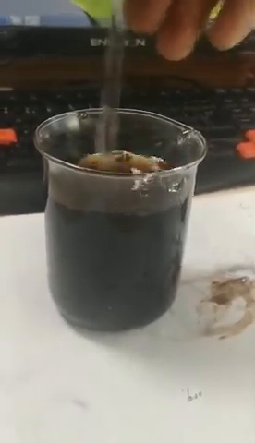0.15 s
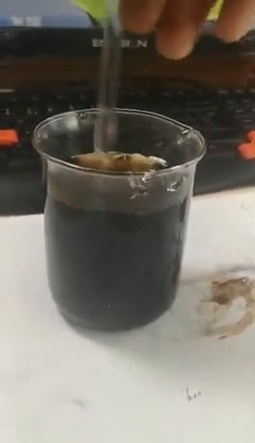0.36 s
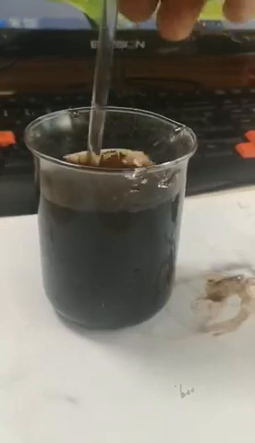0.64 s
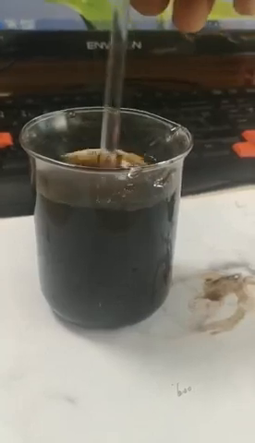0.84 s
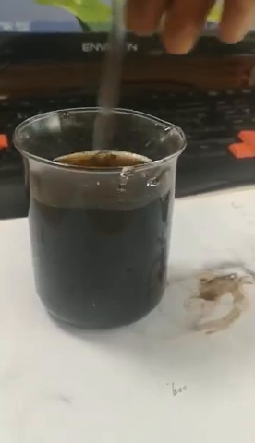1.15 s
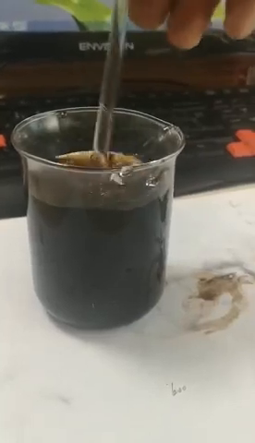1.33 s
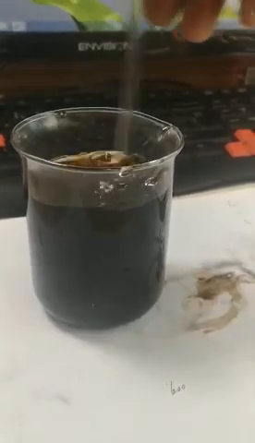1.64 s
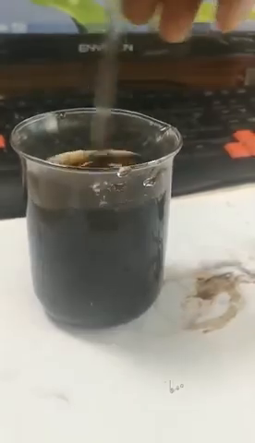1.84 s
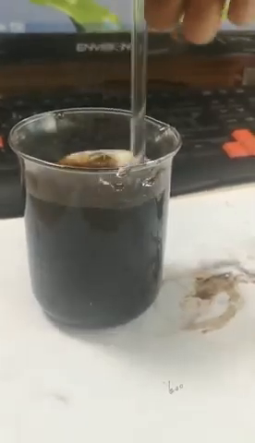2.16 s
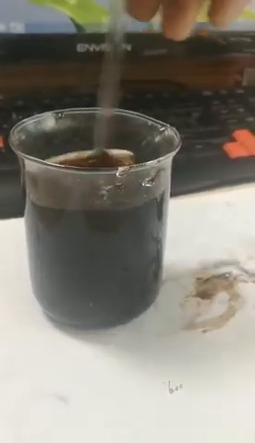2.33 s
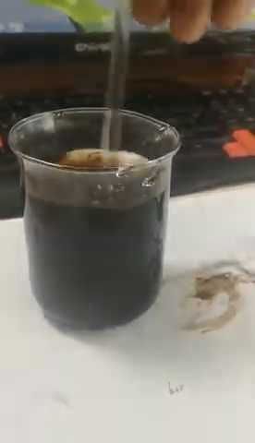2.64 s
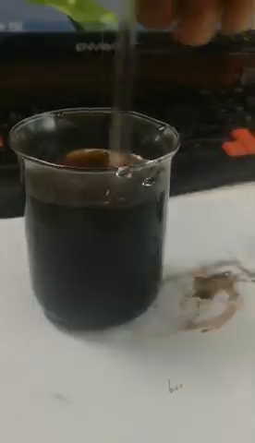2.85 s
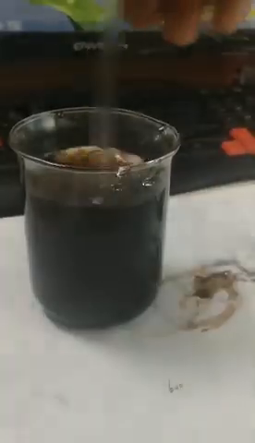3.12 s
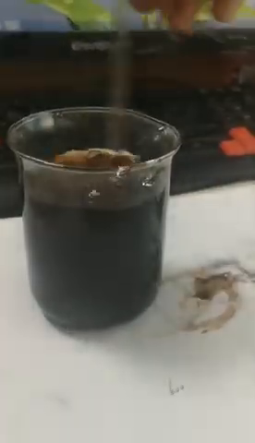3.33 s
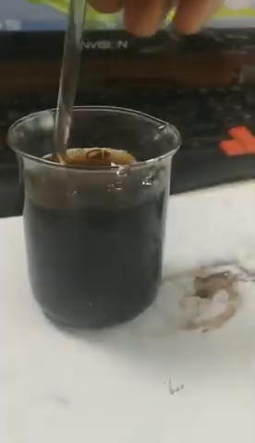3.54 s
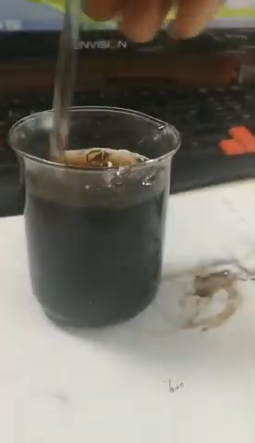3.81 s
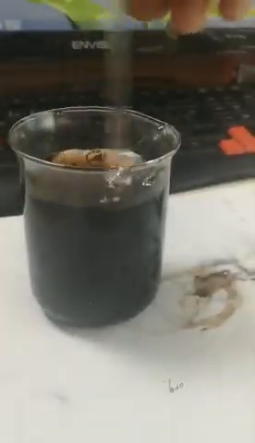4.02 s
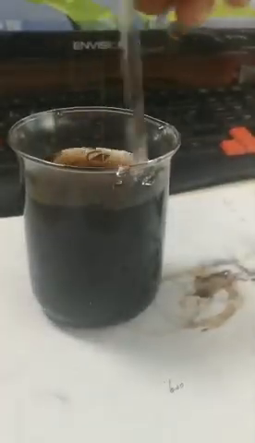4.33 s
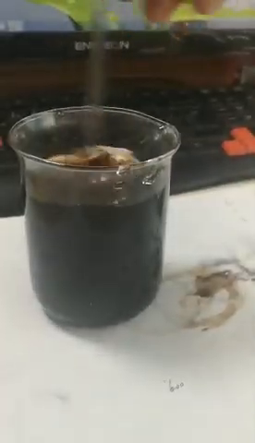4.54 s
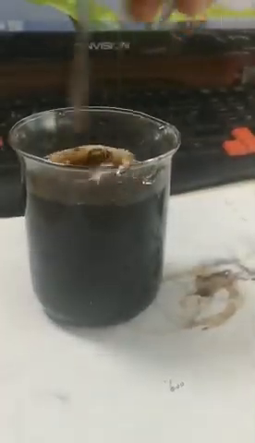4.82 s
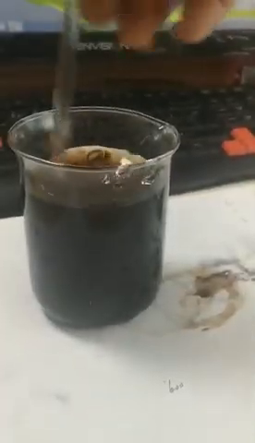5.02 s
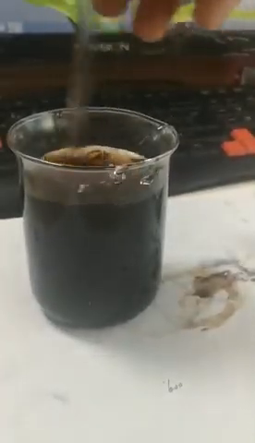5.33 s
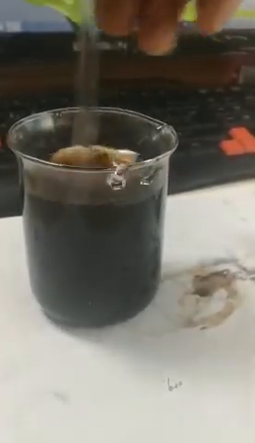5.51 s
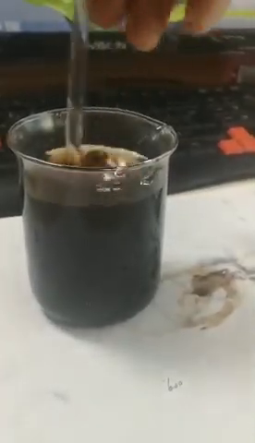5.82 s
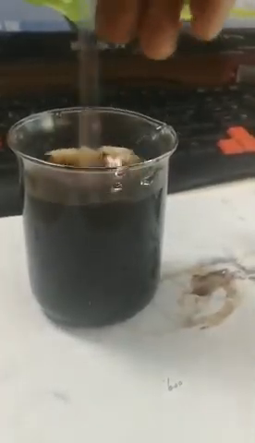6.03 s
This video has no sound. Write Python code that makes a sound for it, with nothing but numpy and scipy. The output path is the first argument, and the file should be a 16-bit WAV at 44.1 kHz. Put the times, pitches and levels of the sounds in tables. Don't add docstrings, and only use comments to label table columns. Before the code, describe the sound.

A glass rod clinks brightly and irregularly against a full glass beaker, sparse at first, then faster and harder, over a faint room hum.

```python
import sys
import numpy as np
from scipy import signal
from scipy.fft import rfft, irfft, next_fast_len
from scipy.io import wavfile
from scipy.ndimage import uniform_filter1d, map_coordinates

SR = 44100
rng = np.random.default_rng(int(sys.argv[2]) if len(sys.argv) > 2 else 0)


def attenuation_scalar(level_db):
    decades = np.asarray(level_db, float) / 20
    return 10 ** decades


def generate_wav(signal):
    frames = np.transpose(np.atleast_2d(signal))
    scaled = np.clip(frames, -1, 1) * 32767
    pcm = np.round(scaled).astype(np.int16)
    wavfile.write(sys.argv[1], SR, pcm)


N = 272097


def unit(x):
    return x / np.sqrt(np.mean(x ** 2) + 1e-20)


def along(points, hz):
    f, v = np.transpose(points)
    return np.interp(np.log(hz + 1), np.log(f + 1), v)


def curve(rows, silent=None):
    s, v = np.transpose(rows)
    return np.interp(np.arange(N) / SR, s, v, silent, silent)


def swell(start, attack, hold, release, db):
    corners = start + np.cumsum(np.abs([0, attack, hold, release]))
    return attenuation_scalar(curve(np.c_[corners, db - np.array([40, 0, 0, 40])], silent=-150))


def filtered(x, response):
    m = next_fast_len(N + 8192)
    return irfft(rfft(x, m) * response(np.fft.rfftfreq(m, 1 / SR)), m)[..., :N]


def stereo_noise(gain, alike, lag_s):
    def mix(hz):
        turn = np.arccos(np.clip(along(alike, hz), -1, 1)) / 2
        return gain(hz) * [np.cos(turn), np.sin(turn)]

    def delay(hz):
        lags = np.array([[lag_s], [0]]) / (1 + (130 / (hz + 1)) ** 2)
        return np.exp(-2j * np.pi * hz * lags)

    common, differing = filtered(rng.standard_normal((2, N)), mix)
    return unit(filtered(np.array([common + differing, common - differing]), delay))


# frequency in Hz, level in dB per Hz.
FAN_AIR = [(12, -29.5), (20, 9), (75, -20.5), (195, -4.5), (230, -6), (330, -10), (440, -2), (500, -13),
           (800, -13.5), (1750, -16.5), (2600, -21.5), (3800, -38), (8000, -38), (16000, -48)]
# hum in Hz, width in Hz, level in dB.
MACHINE_HUMS = [(99.5, 3.1, -68), (120.4, 2.1, -67), (189.3, 5.8, -64.5), (327.1, 10, -65), (655, 1.7, -79),
                (1720, 20, -77.5)]
# frequency in Hz, likeness of the two ports from 0 to 1 once the lag is removed.
PORT_LIKENESS = [(60, 1), (300, 1), (1000, 0.57), (3000, 0.13), (8000, .1)]


def fan_and_machines():
    def lines(f):
        return sum(attenuation_scalar(db) * np.sqrt(w) / np.hypot(w, 2 * (f - hz)) for hz, w, db in MACHINE_HUMS)

    air = attenuation_scalar(-59) * stereo_noise(lambda f: attenuation_scalar(along(FAN_AIR, f)), PORT_LIKENESS, lag_s=26 / SR)
    hum = attenuation_scalar(-57.5) * stereo_noise(lines, PORT_LIKENESS, lag_s=26 / SR)
    return filtered(air + hum, lambda f: attenuation_scalar(np.array([[-1.6], [1.6]]) / (1 + (300 / (f + 1)) ** 2)))


# middle in seconds, level in dB.
HAND_SHIFTS = [(0.05, -63), (0.65, -63), (1.27, -56), (1.58, -64), (2.291, -63), (2.8, -69.5),
               (3.309, -56.5), (3.53, -53.5), (3.9, -53.5), (4.19, -70), (4.6, -62.5), (4.94, -56),
               (5.41, -54.5), (5.65, -57), (6.098, -49.5)]


def hand_on_phone():
    t, half_width_s = np.arange(N) / SR, 0.073
    shifts = sum(attenuation_scalar(db) * np.exp(-((t - s) / half_width_s) ** 2) for s, db in HAND_SHIFTS)
    rumble = stereo_noise(lambda f: (f / 30) / (1 + (f / 50) ** 4), [(50, .99)], lag_s=0)
    thud = stereo_noise(lambda f: 1 / (1 + ((f - 140) / 50) ** 4), [(50, 1.0)], lag_s=0)
    thud_gain = attenuation_scalar(-5.5) * shifts * (shifts / attenuation_scalar(-54.5)) ** .7
    return (attenuation_scalar(-65.5) + shifts) * rumble + thud_gain * thud


# start in seconds, force in dB,
# height toward the rim, weight behind the rod, strike angle in rad.
CLINKS = [(0.2410, 1, -0.64, 0.35, 0.54), (0.6050, -1, -0.32, -0.37, 0.55), (1.0648, -2, -.7, -0.77, 0.72),
          (1.2211, 2, -2.3, 2.5, 0.58), (1.7684, 0.5, 0.04, -0.16, 0.82), (2.9090, 5, -0.13, -0.07, 0.53),
          (3.1823, 5.5, -0.14, 0.67, 0.21), (3.4603, 7, 0.82, 1.14, 0.25), (3.5834, 3.5, 0.65, -0.73, 0.73),
          (3.7700, 12.5, .3, 0.46, 0.55), (4.0586, 7.5, 2, 1.25, 0.15), (4.4016, 1.5, -0.05, -0.77, 0.55),
          (4.9486, 1.6, 0.057, 0.24, 0.45), (5.1983, -3, -0.36, 0.55, 0.092),
          (5.3743, -2.5, 0.41, -0.6, 0.74), (5.5172, 1.5, -0.48, 0.66, 0.92), (5.6197, 6.5, 1.1, -2, .13),
          (5.8955, 4, 0.76, 1.47, 0.59), (6.0083, 5, -1.04, 1.74, 0.28), (6.1374, 9, 0.44, 0.44, 0.85)]
TOUCHES = [(1.1950, -8.5, -2.2, 0.1, 0.7), (1.4533, -16.5, -0.4, 2, 0.097), (1.6388, -47, -3.5, -3.5, 0.32),
           (3.219, -18, 2.3, 0.2, 0.18), (3.2660, -11, -1.2, -2.5, 0.66), (3.2954, -18.5, 1.1, 1.5, 0.49),
           (3.6062, -2, 1, 1.12, 0.56), (3.8017, -3, -0.5, 0.03, 0.35), (4.0815, 4, -1, -2.2, 0.61),
           (4.2166, -23.5, -0.5, -1.1, 0.54), (4.7361, -29.5, -1.7, -2, 0.61), (5.3100, -33, -2.5, -4, 0.4),
           (5.6439, 0.3, 2.5, 1.92, 0.51)]
# dB at force 0, dB per dB of force, dB per height, dB per weight.
ANSWER = dict(oval=(-59.5, 0.63, 0, 7), triangle=(-42, 1.3449, -4.5, -3), square=(-32.5, 1.06, -1.5, -0.37),
          click=(-29, 0.98, 2.6, -0.5), low=(-41, 1.16, -3.5, 2.6), mid=(-30, 0.93, -1, 3),
          rim=(-39.5, 0.75, 4, 1.5), high=(-28.5, 1.1939, 2, 0.84), blow=(-25.5, 0.23, -1.6, 0.8),
          knock=(-42.5, 0.61, -1.66, 6), edge=(-35, 0.76, 4.5, -1))


def contacts():
    s, force, height, weight, angle = np.transpose(sorted(CLINKS + TOUCHES))
    at = np.round((s - .0003) * SR).astype(int)
    db = {name: base + a * force + b * height + c * weight for name, (base, a, b, c) in ANSWER.items()}
    rebound = (np.diff(s, prepend=0) < .036) & (np.diff(force, prepend=0) < 0)
    return at, force, weight, angle, rebound, db


# time in seconds, pitch in Hz.
SWIRL = [
    (0.28, 2709),
    (1.8, 2703),
    (2.93, 2682),
    (3.3, 2682),
    (3.65, 2697),
    (3.8, 2674),
    (4.15, 2693),
    (4.45, 2677),
    (4.97, 2672),
    (6.17, 2670),
]


def water_clocks():
    clock = np.arange(N) / SR
    slosh_hz = 6 * np.sin(2 * np.pi * 6.5 * clock)
    drift = np.cumsum((curve(SWIRL) + slosh_hz) / TRIANGLE[0][0] - 1) / SR
    ripples = map_coordinates(rng.standard_normal(N // 700 + 4), [clock * SR / 700])
    return clock, drift, drift + .0022 * np.cumsum(ripples) / SR


def ring(modes, at, level_db, shares, bend, damped_db, slide, scatter_rad):
    out = np.zeros((2, N))
    ears = np.array([[.5], [-.5]])
    for k, (hz, db, t60, side_db, lead) in enumerate(modes):
        luck = rng.standard_normal((len(at), 2))
        carrier = np.exp(2j * np.pi * hz * bend)
        swing = np.tile(slide * rng.standard_normal(N) + 0j, (2, 1))
        blow = attenuation_scalar(level_db + ears * 4.0 * luck[:, 0]) * np.exp(1j * ears * scatter_rad * luck[:, 1])
        swing[:, at] += blow * shares[k % len(shares)] / carrier[at]
        lost_db = 60 * np.arange(N) / (t60 * SR) + damped_db
        for a in range(1, N, SR // 4):
            part = slice(a, a + SR // 4)
            grow = attenuation_scalar(lost_db[part] - lost_db[a - 1])
            swing[:, part] = (swing[:, [a - 1]] + np.cumsum(swing[:, part] * grow, axis=1)) / grow
        swing = uniform_filter1d(swing, size=24, origin=11)
        out += (attenuation_scalar(db + ears * side_db) * np.exp(1j * ears * lead) * swing * carrier).imag
    return out


# pitch in Hz, level in dB, t60 in seconds,
# left over right in dB, left lead in rad.
OVAL = [(946, -4, 1.8, -3, .4), (974, -4, 1.8, 0, .2)]
TRIANGLE = [(2685, -3, .7, 6, 2.9), (2698, -6.5, .6, 6, -2.6), (2535, -13, .2, 3, 2)]
SQUARE = [(5325, -2, .16, 2, -1.2), (5395, -2, .11, 0, -1.2), (5125, -31, .3, 0, 0)]
RIM = [(6935, 0, .16, 8, .1), (6400, -14, .1, 3, .3)]
HIGH = [(9235, -12, .15, 7, -.7), (9320, -12, .13, 7, -.4), (9270, 0, .016, 7, 0)]
MID_ROD = [(5800, -16, .18, 0, .4), (5900, -14, .14, 0, 1.2), (5855, 0, .04, 1, .8)]
# time in seconds, looseness in dB.
LOOSE = [(0.24, 1.5), (0.6, -6.5), (1.07, -2.5), (1.22, 0), (1.77, -1.5), (3.18, -2), (3.46, -3), (3.58, 2),
         (3.77, -2), (4.06, -4), (4.4, 4), (4.95, 1.6), (5.2, 6), (5.52, 0.5), (5.62, 3.5), (5.643, 5.5),
         (5.9, -0.5), (6.01, -1)]


def long_ringing(contact, clocks, slide):
    at, force, weight, angle, rebound, db = contact
    clock, drift, rough = clocks
    loose_db = curve(LOOSE)[at]

    def twins(lobes):
        return [np.cos(lobes * angle), np.sin(lobes * angle), 1]

    def taken(loss_db):
        return np.cumsum(np.bincount(at - 1, np.clip(loss_db, 0, 25), N))

    damped = taken((6 + 0.27 * force + 1.9 * weight) * np.where(rebound, .2, 1))
    stopped = taken((6 + 0.71 * force) * ~rebound)
    triangle_db = db["triangle"] + 0.5 - 10 * rebound
    square_db = db["square"] - .8 * loose_db + 9.5 - 3 * rebound
    out = ring(OVAL, at, db["oval"] + 2.0, twins(2.05), clock + drift, stopped, 0 * slide, 0.31)
    out += ring(OVAL[:1], np.array([1]), -62.5, [1], clock + drift, stopped, 0 * slide, 0.56)
    out += ring(TRIANGLE, at, triangle_db, twins(0.93), clock + drift, damped, 0.076 * slide, 0.54)
    out += ring(SQUARE, at, square_db, twins(2.4), clock + .8 * rough, damped, 0.34 * slide, .4)
    out += ring(RIM, at, db["rim"] - 2.0, [1], clock + rough, damped, 0.52 * slide, .5)
    out += ring(HIGH, at, db["high"] + 5, twins(0.99), clock + rough, damped, 0.27 * slide, 0.51)
    out += ring(MID_ROD, at, db["mid"] + loose_db + 7, twins(4.6), clock + rough, damped, 1.2 * slide, 1.0)
    return out


def choked(modes, at, level_db, side_db, scatter_db, shift):
    out, t = np.zeros((2, N + SR)), np.arange(SR // 20) / SR
    hz, db, t60 = np.transpose(modes)[:, :, None]
    luck = rng.standard_normal((len(at), 4, len(modes), 1))
    onset = 1 - np.exp(-t / .0004)
    for start, level, side, (size, pitch, lean, lead) in zip(at, level_db, side_db, luck):
        decay_db = 60 * t / np.clip(t60, .004, .02)
        shape = attenuation_scalar(level + db + scatter_db * size - decay_db) * onset
        for ear, sign, late in ((0, .5, 0), (1, -.5, 24)):
            phase = 2 * np.pi * hz * (1 + shift * pitch) * t + sign * .5 * lead
            wave = attenuation_scalar(sign * (side + 5.8 * lean)) * np.sin(phase)
            out[ear, start + late:][:len(t)] += (shape * wave).sum(axis=0)
    return out[:, :N]


# pitch in Hz, level in dB, t60 in seconds.
KNOCK = [(2410, 4.5, 0.013), (2105, -8, .03), (1570, -15.5, 0.018), (1327, -16, 0.022),
         (5100, -12.5, 0.016), (6100, -2, 0.027), (9600, -8.5, .02), (10240, -10.5, .02)]
LOW_ROD = [(3870, -2.5, 0.022), (3820, -9, 0.01), (3960, -9, 0.0086), (4280, -16, 0.017)]
EDGE = [(6587, -2, 0.048), (7797, 0, 0.0092), (9390, -2.5, 0.018), (9870, -10, .02)]
CLICK = [(10050, -8, .016), (10750, -5.5, 0.016), (11940, -8, 0.02), (12540, -3.5, 0.026),
         (14000, -7, .016), (14700, -11, .015), (15000, -12, .015), (16200, -19, .005)]


def rod_knocks(contact):
    at, _, weight, _, _, db = contact
    side_db = 6 - 1.6 * weight
    out = choked(KNOCK, at, db["knock"] + 4.5, side_db, scatter_db=-7.0, shift=.03)
    out += choked(LOW_ROD, at, db["low"] + 11.5, side_db, scatter_db=4.0, shift=0.017)
    out += choked(EDGE, at, db["edge"] + 14.5, side_db, scatter_db=3.0, shift=0.016)
    out += choked(CLICK, at, db["click"] - 0.5, side_db - 12, scatter_db=0.5, shift=0.0081)
    return out


# frequency in Hz, level in dB per Hz.
CRASH = [(1200, -39.5), (1800, -5), (3000, -5), (4500, -0.5), (6000, 0), (7500, -10), (10500, -13),
         (15000, -25)]


def rattle(contact):
    at, db = contact[0], contact[-1]
    blows = np.zeros(N)
    blows[at] = attenuation_scalar(db["blow"] - 17)
    shape = signal.lfilter([1], [1, -attenuation_scalar(-60 / (0.059 * SR))], blows)
    return shape * stereo_noise(lambda f: attenuation_scalar(along(CRASH, f)), [(5000, 0.067)], lag_s=0)


# gap in Hz, width in Hz, depth in dB.
GAPS = [(3310, 730, -24.5), (4546, 710, -13.5), (8880, 690, -11.5), (11450, 490, -14), (13800, 500, -12.5)]


def radiated(hz):
    gaps = []
    for center, width, db in GAPS:
        stiff = center * center - hz * hz
        gaps.append((stiff + 1j * hz * width * attenuation_scalar(db)) / (stiff + 1j * hz * width))
    return (1j * hz / (1j * hz + 600)) ** 2 * np.prod(gaps, axis=0)


def glassware():
    contact = contacts()
    clocks = water_clocks()
    slide = sliding()
    sound = long_ringing(contact, clocks, slide) + rod_knocks(contact)
    sound += slide_grit(slide)
    sound += rattle(contact)
    return filtered(sound, radiated)


# frequency in Hz, t60 in seconds.
ROOM = [(500, .33), (3000, .26), (7000, .26), (13000, .26), (15100, .24), (15600, .03)]


def room(x):
    out = np.zeros((2, N + SR))
    step = SR // 5
    for start in range(0, N, step):
        hz, t, z = signal.stft(rng.standard_normal((2, SR // 2)), SR, nperseg=256)
        fade = attenuation_scalar(-60 * t / along(ROOM, hz)[:, None])
        tail = signal.istft(z * fade, SR, nperseg=256)[1]
        tail *= np.clip(np.arange(tail.shape[1]) / (.006 * SR), 0, 1)
        wet = signal.fftconvolve(x[:, start:start + step], tail / np.linalg.norm(tail[0]), axes=1)
        out[:, start:start + wet.shape[1]] += wet
    return out[:, :N]


# time in seconds, level in dB.
SWISH = [
    (0.3, -76),
    (1.11, -69.5),
    (1.45, -80),
    (2.2, -80),
]
# frequency in Hz, level in dB per Hz.
WATER = [(2000, -26), (3500, 0.5), (5500, 5.5), (8000, -6.5), (11000, -14), (15000, -21)]


def water_swish():
    return attenuation_scalar(curve(SWISH) - 2.5) * stereo_noise(lambda f: attenuation_scalar(along(WATER, f)), [(5000, 0.36)], lag_s=0)


# frequency in Hz, level in dB per Hz.
GRIT = [(1000, -30), (1800, -6), (3200, -3), (6300, 0), (7200, -14), (10500, -12), (13500, -20),
        (14200, -60)]


def grind():
    since = np.arange(N) / SR - CLINKS[3][0]
    shape = (since > 0) * attenuation_scalar(-33 - 60 * np.clip(since, 0, 2) / .13)
    return shape * stereo_noise(lambda f: attenuation_scalar(along(GRIT, f)), [(5000, .4)], lag_s=0)


# start, attack, hold and release in seconds.
RUSTLE = (2.62, .04, .05, 1.1)
# frequency in Hz, level in dB per Hz.
CLOTH = [(900, -42), (2000, -1.5), (3200, -5.5), (6000, -14), (9500, -27), (12000, -42.5)]


def far_cloth():
    return swell(*RUSTLE, db=-61.5) * stereo_noise(lambda f: attenuation_scalar(along(CLOTH, f)), [(3000, 0.1)], lag_s=0)


# start, attack, hold and release in seconds.
SQUEAK = (2.92, .05, .1, .25)


def far_hinge():
    band = stereo_noise(lambda f: 1 / (1 + ((f - 1430) / 45) ** 2), [(1400, .7)], lag_s=0)
    return swell(*SQUEAK, db=-62) * band


# start, attack, hold and release in seconds.
SLIDE = (4.46, .06, .37, .05)
CATCH = (4.665, .02, .003, .06)
DRAG = (5.06, .05, .05, .05)


def sliding():
    grip = attenuation_scalar(3 * unit(uniform_filter1d(rng.standard_normal(N), 500)))
    strokes = swell(*SLIDE, db=-67.5) + swell(*CATCH, db=-56.5) + swell(*DRAG, db=-69.5)
    return attenuation_scalar(-22) * strokes * grip


def slide_grit(slide):
    return 1.8 * slide * stereo_noise(lambda f: attenuation_scalar(along(WATER, f / 2.6)), [(5000, 0.28)], lag_s=0)


def scene():
    glass = glassware()
    near = glass + attenuation_scalar(-15) * room(glass)
    around = fan_and_machines() + hand_on_phone() + far_cloth() + far_hinge() + water_swish()
    crunch = grind()
    return near + around + crunch + attenuation_scalar(-12.5) * room(crunch)


def low_pass(x):
    return signal.sosfilt(signal.butter(12, 17140, fs=SR, output="sos"), x)


def record(dry):
    band = filtered(dry, lambda f: 1 / (1 + (f / 16700) ** 60))
    rounded = band / (1 + np.abs(band / .86) ** 6) ** (1 / 6)
    return low_pass(rounded)


dry = scene()
out = record(dry)
generate_wav(out)
```